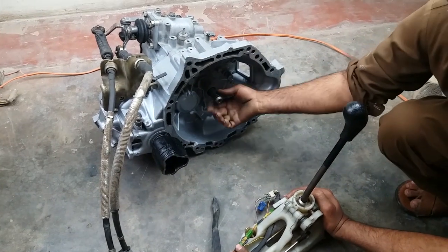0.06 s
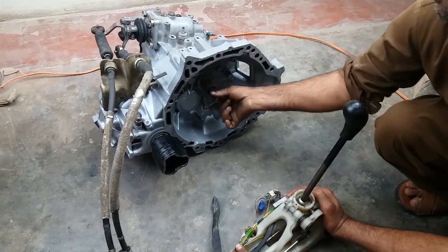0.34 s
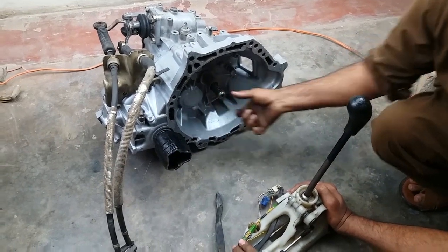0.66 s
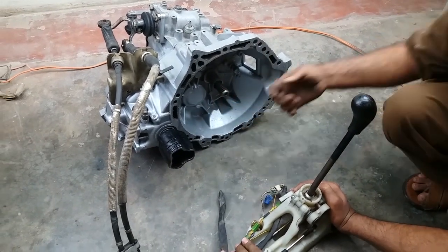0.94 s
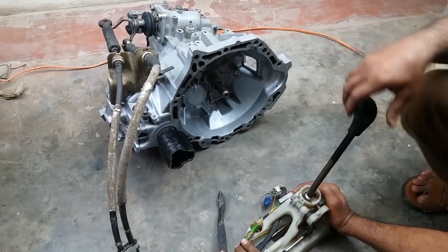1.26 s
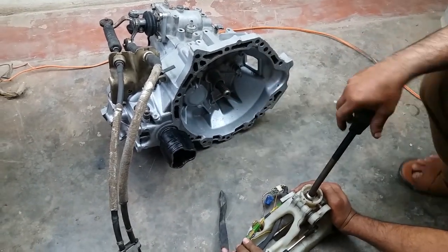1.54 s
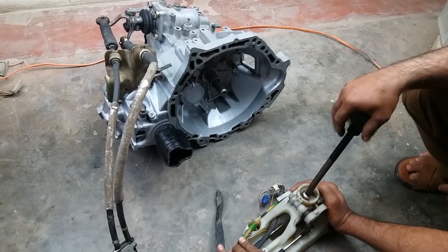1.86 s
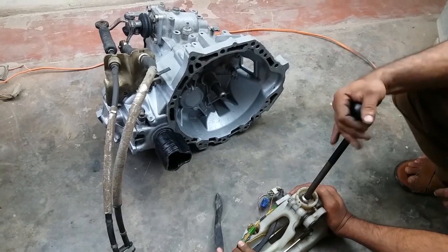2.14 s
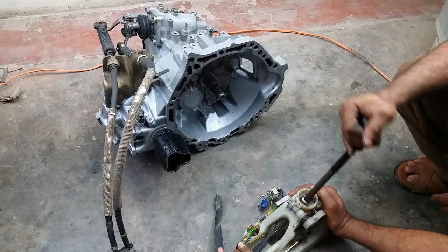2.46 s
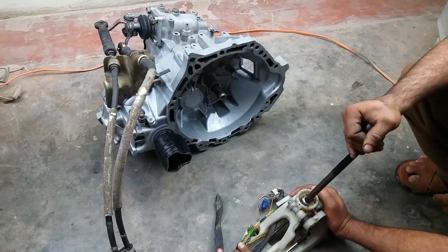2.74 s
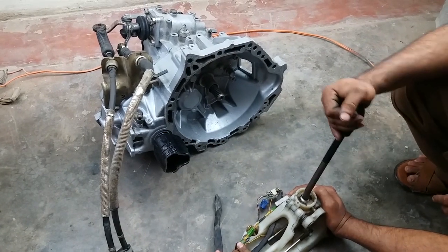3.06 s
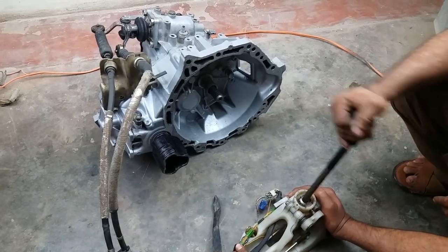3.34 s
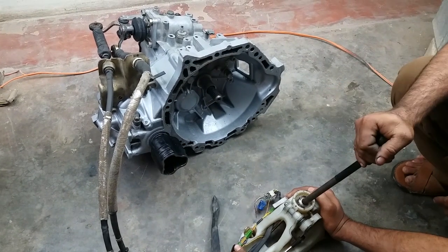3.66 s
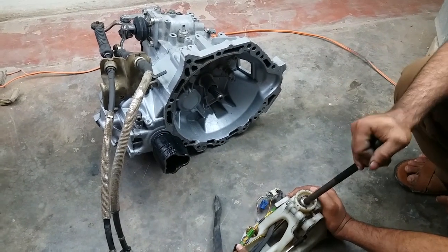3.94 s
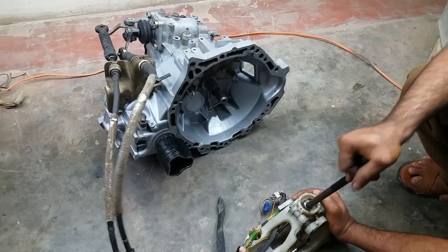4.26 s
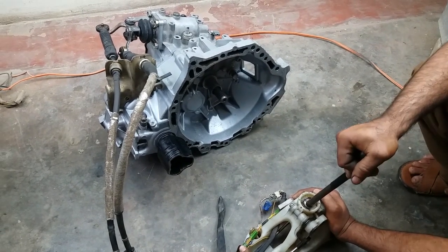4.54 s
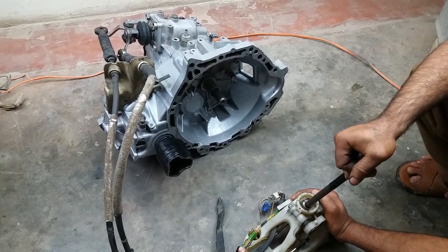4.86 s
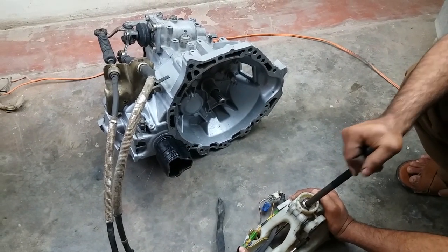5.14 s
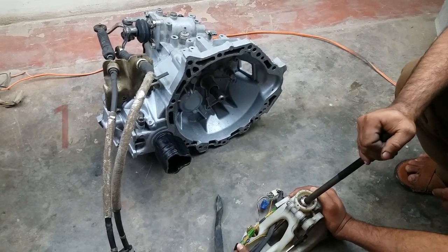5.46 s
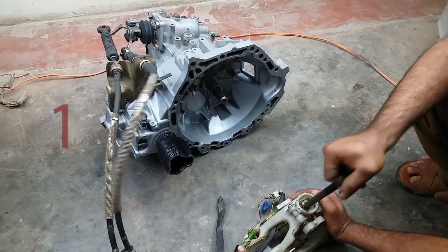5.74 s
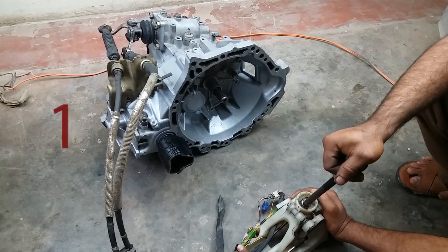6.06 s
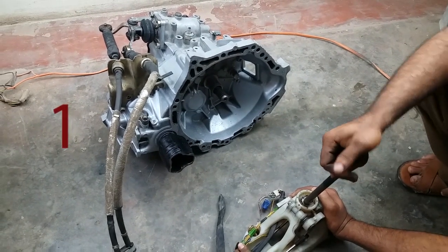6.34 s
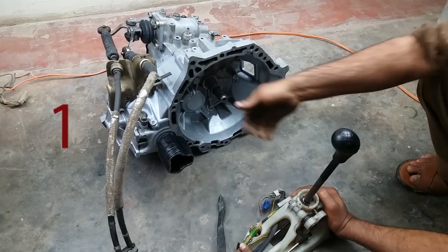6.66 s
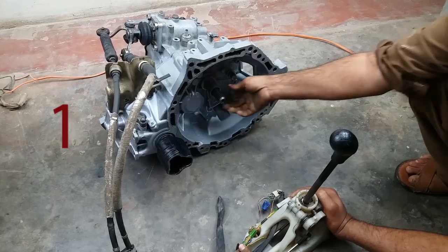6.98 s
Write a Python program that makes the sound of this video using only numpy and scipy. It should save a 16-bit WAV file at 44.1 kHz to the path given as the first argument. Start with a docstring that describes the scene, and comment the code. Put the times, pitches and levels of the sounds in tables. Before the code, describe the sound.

In a quiet workshop, a gearbox shaft turns with a faint bearing rumble, then stops with a blunt clunk. A sandal scuffs the concrete. The shift lever gives separate sharp metallic clicks and a clunk, and a few soft thumps sound close to the microphone. Later a quick, louder cluster of clunks rings the metal case as a gear goes in, followed by one last double click.

```python
"""Gearbox shifted by hand

A removed car gearbox lies on a concrete workshop floor. Its input shaft is spun on rumbling bearings,
clicks and drops against its play with a clunk; a sandal scuffs. Lever and detents click, cable or hand
slides, and forks clunk, ringing the alloy case. Faint friction whines and a few soft thumps close to
the microphone sound over a quiet room."""
import sys
import numpy as np
from scipy import signal
from scipy.fft import rfft, irfft, next_fast_len
from scipy.io import wavfile

SR = 44100
rng = np.random.default_rng(int(sys.argv[2]) if len(sys.argv) > 2 else 0)


def dump_mix(stems):
    """Bounce the given channels to the path in sys.argv[1] as a 16-bit WAV at rate SR."""
    frames = np.atleast_2d(stems).T  # one column per channel
    limited = np.clip(frames, -1, 1)  # hard clip at full scale
    pcm = np.round(limited * 32767).astype(np.int16)
    wavfile.write(sys.argv[1], SR, pcm)


N = 317916
TIME = np.arange(N) / SR

# left-right correlation of sounds at the microphone: f/Hz, correlation
CORRELATION = [(100, 1), (400, 0.87), (900, 0.67), (1600, 0.0013), (2600, 0.041), (6000, -0.066),
               (15000, 0.62)]


def from_db(db):
    """Decibels to gain."""
    return 10 ** (np.asarray(db) / 20)


def unit_rms(x):
    """Scale to unit power."""
    return x / np.sqrt(np.mean(x ** 2) + 1e-20)


def at_hz(points, hz):
    """Read a table on a log-frequency axis."""
    f_hz, value = np.transpose(points)
    return np.interp(np.log(np.maximum(hz, 1)), np.log(f_hz), value)


def decay(t, t60_s):
    """Exponential fall, 60 dB in t60_s."""
    return np.exp(-np.log(1000) * t / t60_s)


def rise(t, tau_s):
    """Exponential approach to 1."""
    return 1 - np.exp(-t / tau_s)


def band(x, low_hz, high_hz):
    """Causal band-pass."""
    sos = signal.butter(3, [low_hz, min(high_hz, .48 * SR)], "band", fs=SR, output="sos")
    return signal.sosfilt(sos, x)


def add(track, start_s, sound):
    """Mix a sound in at start_s."""
    at = max(round(start_s * SR), 0)
    track[..., at:at + sound.shape[-1]] += sound[..., :N - at]


def noise(spectrum, size, correlation=CORRELATION):
    """Coloured, partly correlated stereo noise, rms 1."""
    length = next_fast_len(size)
    hz = np.fft.rfftfreq(length, 1 / SR)
    mid, side = rfft(rng.standard_normal((2, length))) * from_db(at_hz(spectrum, hz))
    alike = np.clip(at_hz(correlation, hz), -.99, .99)
    stereo = np.sqrt(1 + alike) * mid + np.sqrt(1 - alike) * side * [[1], [-1]]
    return unit_rms(irfft(stereo, length)[:, :size])


def pan(x, balance):
    """Equal-power pan per frequency."""
    length = next_fast_len(N)
    hz = np.fft.rfftfreq(length, 1 / SR)
    gains = from_db(at_hz(balance, hz) * np.array([[.5], [-.5]]))
    gains /= np.sqrt(np.mean(gains ** 2, axis=0))
    return irfft(rfft(x, length) * gains, length)[:, :N]


def flutter(rate_hz, depth_db):
    """Randomly wavering gain."""
    knots_s = np.arange(0, TIME[-1] + 1, 1 / rate_hz)
    return from_db(depth_db * np.interp(TIME, knots_s, rng.standard_normal(len(knots_s))))


def bump(hz, swell_s):
    """Soft swing of a few cycles; hz is the pitch per sample."""
    t = TIME[:len(hz)]
    envelope = np.sqrt(t / swell_s) * np.exp(.5 - .5 * t / swell_s)
    return envelope * np.sin(2 * np.pi * np.cumsum(hz) / SR)


def room_air(hush_db=-68):
    """Steady hush, wavering low rumble and hum; the recorder's bass fades in over the first second."""
    hush_spectrum = [(25, 1.5), (60, -12.5), (150, -21.5), (300, -3.5), (400, -9), (520, -11.5),
                     (750, -11.5), (1150, -15), (1400, -16), (2500, -20), (4100, -26), (8000, -32),
                     (15800, -27)]  # f/Hz, level/dB
    rumble_spectrum = [(25, -18), (45, -5.5), (65, -6), (95, -1.5), (125, 2), (170, -4), (230, -11.5),
                       (330, -14.5), (600, -40), (2000, -80)]  # f/Hz, level/dB
    bass_fade_in = [(0, -81), (.55, -78), (.9, -67.5)]  # t/s, level/dB
    motor_lines = [(97, -79), (124, -78), (150, -81.5)]  # f/Hz, level/dB
    correlation = [(60, 0.83), (150, 0.87), (380, 0.78), (950, 0.23), (2380, 0.053), (5980, -0.13),
                   (15000, 0.14)]  # f/Hz, left-right correlation
    balance = [(60, 0.43), (150, 2.5), (380, 3.5), (950, 3.6), (2380, 1.1), (5980, 1.0), (15000, 0.81)]  # f/Hz, left minus right/dB
    hush = from_db(hush_db) * noise(hush_spectrum, N, correlation)
    bass_gain = from_db(np.interp(TIME, *np.transpose(bass_fade_in))) * flutter(rate_hz=2.5, depth_db=1)
    rumble = bass_gain * noise(rumble_spectrum, N, correlation)
    hum = 0
    for hz, db in motor_lines:
        tone = np.sqrt(2) * np.sin(2 * np.pi * (hz * TIME + rng.random()))
        hum += from_db(db) * tone * flutter(rate_hz=4.1, depth_db=2)
    return pan(hush + rumble + unit_rms(bass_gain) * hum, balance)


def turning_shaft(level_db=-1, spin_up_db_per_s=290, coast_db_per_s=63):
    """Bearings and teeth rumble unevenly as the shaft is spun up, held and left to coast."""
    spins = [(0, 0.034, -55.5), (.37, 0.11, -54.5)]  # full speed t/s, hold/s, level/dB
    bearing_spectrum = [(150, -32), (220, -23), (280, -8), (400, -5.5), (620, -4), (970, -14),
                        (1150, -20.5), (1600, -17), (2500, -27.5), (4200, -33.5), (7000, -41.5),
                        (14000, -39.5)]  # f/Hz, level/dB
    envelope = 0
    for full_s, hold_s, db in spins:
        spin_up_db = spin_up_db_per_s * np.maximum(full_s - TIME, 0)
        coast_db = coast_db_per_s * np.maximum(TIME - full_s - hold_s, 0)
        envelope += from_db(db - spin_up_db - coast_db)
    teeth = unit_rms(flutter(rate_hz=160, depth_db=2.5))
    return from_db(level_db) * envelope * noise(bearing_spectrum, N) * teeth


def struck_metal(db, modes, scatter_db=2.5, linewidth_ratio=.018, max_t60_s=.13):
    """A blow rings the modes; loose parts on the metal blur their pitch and cut them short."""
    t, rings = TIME[:SR // 4], 0
    for hz, mode_db, t60_s in modes:
        rattle = np.cumsum(rng.standard_normal(len(t))) * np.sqrt(2 * np.pi * linewidth_ratio * hz / SR)
        right_lag = rng.choice([-1, 1]) * np.arccos(np.clip(at_hz(CORRELATION, hz), -1, 1))
        phase = 2 * np.pi * (hz * t + rng.random()) + rattle + np.array([[0], [right_lag]])
        gain = from_db(mode_db + scatter_db * rng.standard_normal())
        rings += gain * decay(t, min(t60_s, max_t60_s)) * np.sin(phase)
    return from_db(db) * rings * rise(t, .00046)


def contact(db, tilt_db_per_oct, t60_s, zones_db, case_db, lever_db, seat_s=.001):
    """Parts seat with a dense jangle, brighter the harder they meet, and ring case and lever."""
    jangle_spectrum = [(50, -18), (90, 5.5), (160, 1), (260, -3), (600, 5.5), (860, 0), (1250, 1),
                       (1600, 1.5), (2000, -4), (3100, -9), (4000, -15), (5200, -15.5), (7000, -25.5),
                       (10000, -23.5), (15500, -31)]  # f/Hz, level/dB
    zone_edges_hz = [90, 350, 900, 1900, 3400, 6400, 15500]  # six zones, thud to tick: f/Hz
    case_modes = [(431, -6, .11), (605, -4, 0.14), (743, -2, 0.061), (956, -6, 0.058), (996, -8.5, 0.09),
                  (1226, -3, 0.061), (1415, 8, 0.038), (1519, 0.5, 0.065), (1740, -7, 0.11),
                  (1925, -8, 0.079), (2050, -27.5, 0.058)]  # alloy case: f/Hz, level/dB, t60/s
    lever_modes = [(2498, 1, 0.055), (2507, -8, 0.042), (2663, -6, 0.12), (2780, -1, 0.1), (3240, -16, .04),
                   (3740, -18, .05), (4500, -13, .035)]  # steel lever: f/Hz, level/dB, t60/s
    t, edges_hz = TIME[:SR // 4], np.array(zone_edges_hz)
    jangle = noise(jangle_spectrum, len(t)) * rise(t, seat_s)
    centres_hz = np.sqrt(edges_hz[:-1] * edges_hz[1:])
    octaves = np.maximum(np.log2(centres_hz / 800), 0)  # tilt acts above 800 Hz
    levels_db = db + tilt_db_per_oct * octaves + np.array(zones_db)
    t60s_s = t60_s * np.geomspace(1.34, 1, len(levels_db))  # low zones last longer
    sound = struck_metal(db + case_db, case_modes) + struck_metal(db + lever_db, lever_modes)
    for low_hz, high_hz, zone_db, zone_t60_s in zip(edges_hz, edges_hz[1:], levels_db, t60s_s):
        sound += from_db(zone_db) * band(jangle * decay(t, zone_t60_s) + 1e-18, low_hz, high_hz)
    return sound


def gearbox_contacts():
    """Lever, detent and shaft clicks, a dry tick, short slides of cable or hand, fork and gear clunks."""
    clicks = [(.095, -67, .3, -9), (.278, -62, -.7, -15), (2.5134, -47.5, 1.2, 0), (3.003, -62, 1, -6),
              (3.035, -58, 2.5, -3), (3.0694, -42.5, 6.1, 1.5), (3.083, -37.5, 4.5, -2),
              (3.108, -37.5, .6, -4.5), (3.3803, -49, 3.6, -5), (3.9196, -58, -3.2, -20),
              (4.2901, -50, -.3, -7), (5.3753, -50.5, 2.4, -4), (6.492, -45, 3.9, -5),
              (6.502, -40.5, .5, -10)]  # t/s, level/dB, tilt/(dB/oct), lever ring/dB
    slides = [(.689, -51), (2.483, -59), (3.364, -63), (3.4364, -46), (4.194, -61), (5.192, -57.5),
              (5.208, -61), (5.666, -50)]  # t/s, level/dB
    clunks = [(3.462, -33, -3.1, -16, .054), (4.303, -41, -2.4, -10, .06), (5.6725, -37, -1, -18, 0.064),
              (5.681, -36.5, -1.8, -15, .12), (5.713, -33.5, -.8, -5, .15), (5.761, -33, .4, -3.5, .085),
              (5.768, -27, -4, -8, .07)]  # t/s, level/dB, tilt/(dB/oct), case ring/dB, jangle t60/s
    # jangle per zone, thud to tick: level/dB
    click_zones_db = [0, -1, .5, 3.8, 5.5, 1.3]
    slide_zones_db = [1.5, -1.5, 0, 5.5, -.5, .5]
    clunk_zones_db = [2.5, 1.2, 2, 5, .3, 0]
    out = np.zeros((2, N))
    for start_s, db, tilt, ring_db in clicks:
        click = contact(db, tilt, t60_s=.064, zones_db=click_zones_db, case_db=-11, lever_db=ring_db)
        add(out, start_s, click)
    for start_s, db in slides:
        slide = contact(db, tilt_db_per_oct=.74, t60_s=.19, zones_db=slide_zones_db,
                        case_db=-8, lever_db=-12.5, seat_s=.002)
        add(out, start_s, slide)
    for start_s, db, tilt, ring_db, t60_s in clunks:
        clunk = contact(db, tilt, t60_s, clunk_zones_db, case_db=ring_db, lever_db=ring_db - 3.5)
        add(out, start_s, clunk)
    return out


def scuffs(level_db=1.5):
    """Skin and sandal rub in short, gritty swells."""
    strokes = [(0.699, -55, 0.015, 0.063), (1.507, -60, .004, .015), (1.554, -46.5, .03, 0.038),
               (1.797, -53.5, .027, 0.027)]  # peak t/s, level/dB, rise/s, fall/s
    rub_spectrum = [(120, -29), (200, -13), (288, -7.5), (399, -14.5), (715, -8.5), (957, -9), (1330, 0),
                    (1540, -2), (2380, -2), (3480, -5), (4580, -13), (11800, -18), (15500, -21.5)]  # f/Hz, level/dB
    pressure = 0
    for peak_s, db, rise_s, fall_s in strokes:
        width_s = np.where(TIME < peak_s, rise_s, fall_s)
        pressure += from_db(db) * np.exp(-.5 * ((TIME - peak_s) / width_s) ** 2)
    return from_db(level_db) * pressure * noise(rub_spectrum, N) * flutter(rate_hz=900, depth_db=2.5)


def shaft_clunk(start_s=.7257, level_db=-25.5, contact_s=.00072, echo_db=-14):
    """The shaft drops against its play; one blunt blow rings it, and floor and wall echo."""
    shaft_modes = [(147, -29, .06), (251, -10, 0.055), (334.5, -3, 0.053), (500, -7, 0.028),
                   (605, 8, 0.016), (1020, 0.5, 0.032), (1142, 6.5, 0.019), (1310, 3, 0.016),
                   (1750, -9.5, 0.028), (2780, -11, 0.016)]  # f/Hz, level/dB, t60/s
    out, t = np.zeros((2, N)), TIME[:SR // 2]
    rings = sum(from_db(db) * decay(t, t60_s) * np.sin(2 * np.pi * hz * t)
                for hz, db, t60_s in shaft_modes)
    clunk = from_db(level_db) * band(rings * rise(t, contact_s), low_hz=145, high_hz=2600)
    add(out, start_s, clunk)
    for delay_s in (.0075, .0163):
        add(out, start_s + delay_s, from_db(echo_db) * clunk)
    return out


def spring_clinks(spread_ratio=1.045, t60_s=.058, seat_s=.00098):
    """Springs and detent balls ring in tight clusters of high modes."""
    clinks = [(2.512, -54.5, 5680), (3.0706, -39.5, 7700), (3.382, -48.5, 4800), (5.3748, -54, 5700),
              (5.3752, -44, 14250), (5.717, -40, 2250), (5.761, -39, 4980), (5.768, -50, 4500),
              (6.501, -50, 8800)]  # t/s, level/dB, f/Hz
    out, t = np.zeros((2, N)), TIME[:SR // 4]
    for start_s, db, hz in clinks:
        narrow_noise = band(rng.standard_normal((2, SR)), hz / spread_ratio, hz * spread_ratio)
        cluster = unit_rms(narrow_noise[:, -len(t):])
        add(out, start_s, from_db(db) * cluster * decay(t, t60_s) * rise(t, seat_s))
    return out


def friction_whines(sag_ratio=.035):
    """Friction sings faintly in a narrow, grainy band that sags in pitch."""
    whines = [(2.88, .2, 655, -72), (3.53, .2, 1370, -74), (3.69, .09, 1325, -65), (4.45, .4, 1420, -77),
              (4.92, .33, 600, -73), (5.45, .15, 1340, -77), (6.08, .27, 1350, -74)]  # t/s, length/s, initial f/Hz, level/dB
    out = np.zeros(N)
    grain = unit_rms(band(rng.standard_normal((2, N)), low_hz=3, high_hz=70))
    for start_s, length_s, hz, db in whines:
        progress = np.clip((TIME - start_s) / length_s, 0, 1)
        phase = 2 * np.pi * np.cumsum(hz * (1 - sag_ratio * progress)) / SR
        tone = grain[0] * np.sin(phase) + grain[1] * np.cos(phase)
        out += from_db(db) * np.sin(np.pi * progress) * tone
    return out


def close_thumps(start_hz=232, end_hz=64, sink_s=.008,
                 rub_db=-24, rub_s=.057, tick_db=-6, tick_s=.00093):
    """Soft bumps sink in pitch as the pressure lets go, each with a dry tick and a little rub."""
    thumps = [(3.9418, -37, -22), (3.973, -47, -18), (4.001, -42.5, -13), (4.047, -40.5, -15.5)]  # t/s, level/dB, left minus right/dB
    rub_spectrum = [(300, 8.5), (1000, -1), (3000, -13), (12000, -40)]  # f/Hz, level/dB
    out, t = np.zeros((2, N)), TIME[:SR // 6]
    swing = bump(end_hz + (start_hz - end_hz) * np.exp(-t / sink_s), swell_s=.0055)
    friction = from_db(rub_db) * np.exp(-t / rub_s) + from_db(tick_db) * np.exp(-t / tick_s)
    for start_s, db, pan_db in thumps:
        rub = friction * rise(t, tick_s) * noise(rub_spectrum, len(t))
        add(out, start_s, from_db(db) * (swing + rub) * from_db([[pan_db / 2], [-pan_db / 2]]))
    return out


def case_thud(start_s=5.6805, level_db=-31, pitch_hz=160):
    """The heavy case rocks once on the floor as the gear goes in."""
    out = np.zeros((2, N))
    add(out, start_s, from_db(level_db) * bump(np.full(SR // 6, pitch_hz), swell_s=.005))
    return out


def workshop_reverb(x, wet_db, build_s=.0082, dull_hz=7000):
    """Hard walls return a diffuse tail that builds briefly and dies sooner in the treble."""
    decay_times = [(120, 0.64), (500, 0.56), (1400, 0.4), (4000, 0.34), (14000, 0.31)]  # f/Hz, t60/s
    t, edges_hz = TIME[:SR], np.geomspace(60, 16000, 9)
    white = noise([(60, 0), (16000, 0)], SR)
    tail = 0
    for low_hz, high_hz in zip(edges_hz, edges_hz[1:]):
        hz = np.sqrt(low_hz * high_hz)
        envelope = decay(t, at_hz(decay_times, hz)) / np.hypot(1, hz / dull_hz)
        tail += band(white, low_hz, high_hz) * envelope
    tail *= rise(t, build_s) / np.sqrt(SR / 50)
    return from_db(wet_db) * signal.fftconvolve(x[:1], tail, axes=1)[:, :N]


def scene():
    """Gearbox and scuffs reverberate in the workshop; thud, thumps and whines stay dry."""
    # each source at the two microphone ports: f/Hz, left minus right/dB
    gearbox_balance = [(100, 3.5), (300, 3.5), (600, 5.5), (1500, 5.5), (2100, 2.5), (2700, -2), (3800, 0),
                       (5200, 6), (7500, 19.5), (11000, 7), (15000, 10)]
    scuff_balance = [(400, 4.5), (1500, 6), (3000, -1), (8000, 16), (14000, 8)]
    gearbox = gearbox_contacts() + shaft_clunk() + turning_shaft()
    springs, rubbing = spring_clinks(), scuffs()
    reverb = workshop_reverb(gearbox + from_db(-5.5) * springs, wet_db=-4)
    gearbox_heard = pan(gearbox + case_thud() + springs + reverb, gearbox_balance)
    scuffs_heard = pan(rubbing + workshop_reverb(rubbing, wet_db=-7.5), scuff_balance)
    return gearbox_heard + scuffs_heard + close_thumps() + friction_whines() + room_air()


def record(dry):
    """Bass roll-off and steep treble cut."""
    low_cut_hz, high_cut_hz = 75, 15900
    thinned = signal.sosfilt(signal.butter(2, low_cut_hz, "high", fs=SR, output="sos"), dry)
    return signal.sosfilt(signal.ellip(12, .2, 70, high_cut_hz, fs=SR, output="sos"), thinned)


dry = scene()
out = record(dry)
dump_mix(out)
```